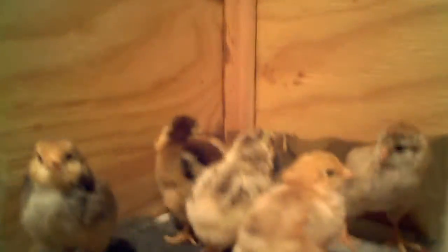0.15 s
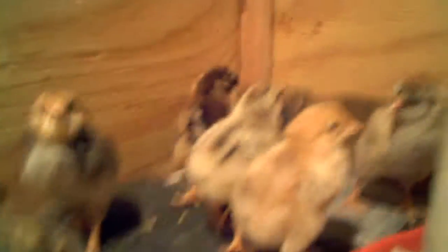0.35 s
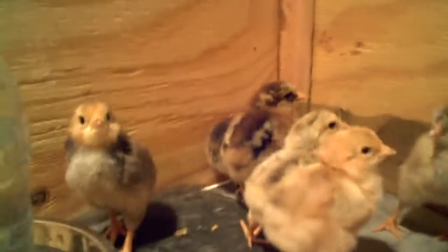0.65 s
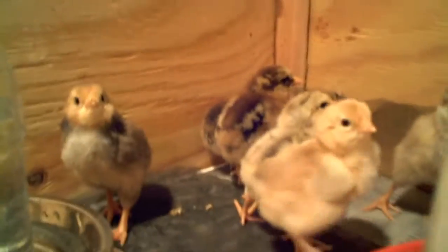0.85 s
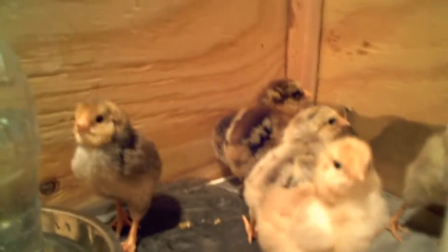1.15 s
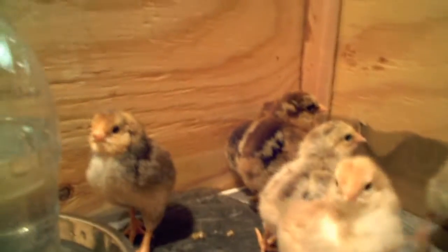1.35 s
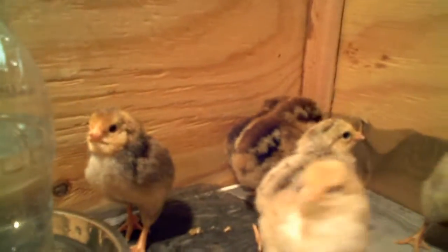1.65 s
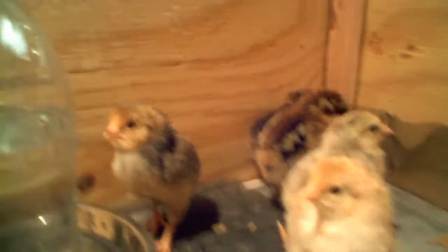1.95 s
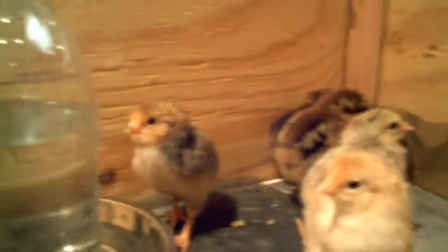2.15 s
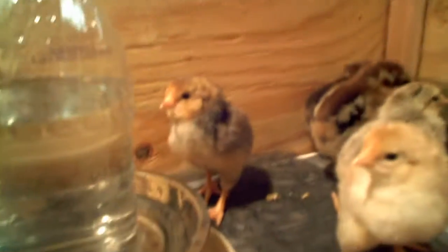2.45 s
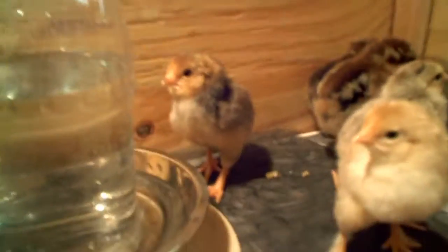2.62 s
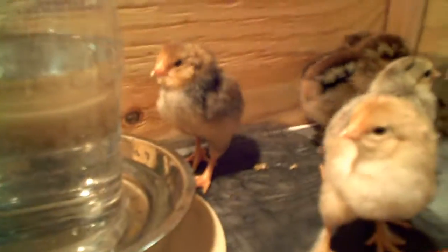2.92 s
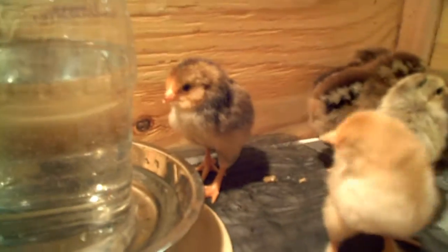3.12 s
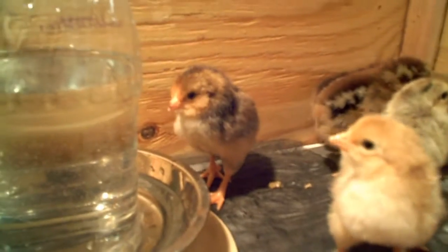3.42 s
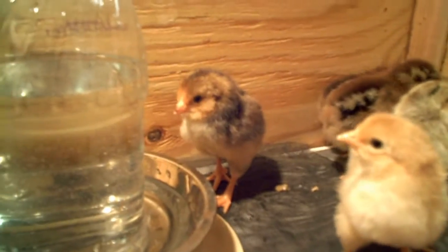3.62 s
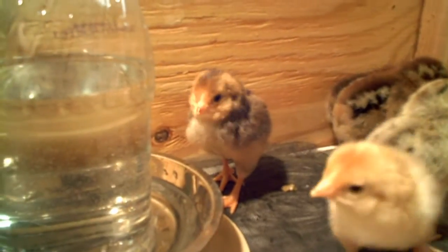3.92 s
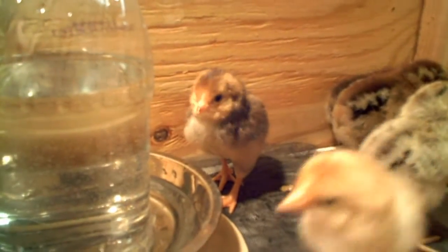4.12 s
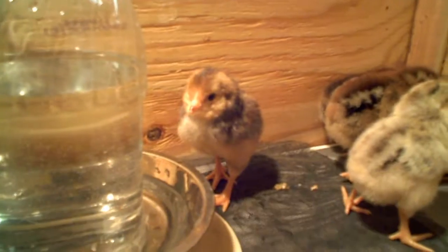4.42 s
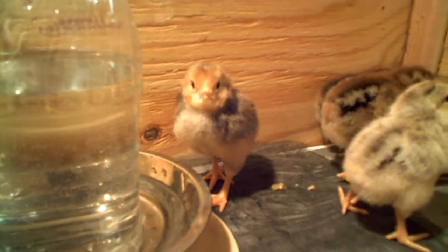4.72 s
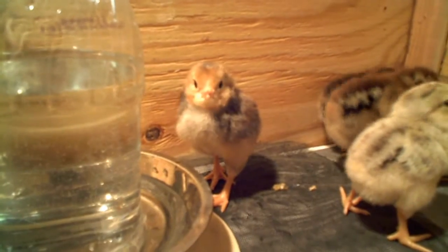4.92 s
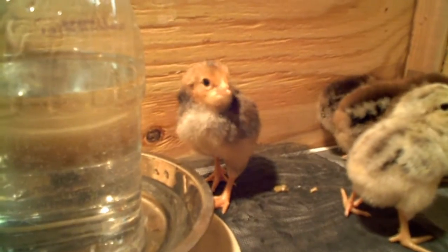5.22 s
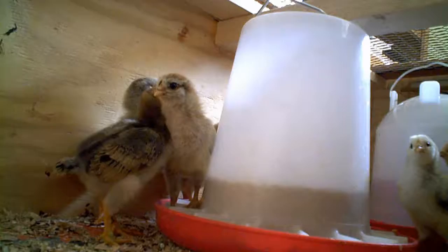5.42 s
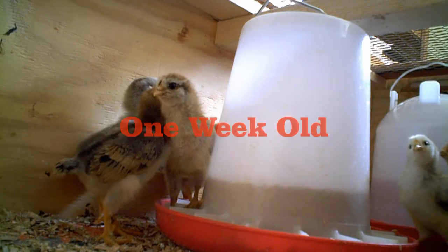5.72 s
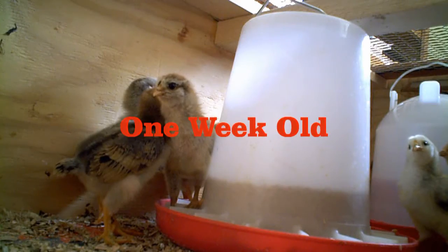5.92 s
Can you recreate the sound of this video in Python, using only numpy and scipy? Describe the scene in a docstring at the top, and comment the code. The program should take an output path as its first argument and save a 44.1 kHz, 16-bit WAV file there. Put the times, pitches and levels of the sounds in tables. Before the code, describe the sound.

Young chicks peep and chirp in short gliding whistles, with two loud handling clicks early on, light foot taps and soft brushing in a wooden box.

```python
"""Young chicks peep, chirp and twitter in a plywood brooder box, close to a hand-held camera.
Their calls are gliding whistles that flutter as echoes from the near walls mix in. Feet and beaks
ring, tap and scratch the hollow floor, which also hums with tiny slips as something drags over it.
Filtered friction noise brushes along in short strokes; the camera body gives two loud and two
fainter clicks through its shell resonances. Quiet coloured noise is the room air."""
import sys
import numpy as np
from scipy import signal
from scipy.fft import rfft, irfft, next_fast_len
from scipy.io import wavfile
from scipy.ndimage import uniform_filter1d, map_coordinates

SR = 44100
rng = np.random.default_rng(int(sys.argv[2]) if len(sys.argv) > 2 else 0)


def inscribe(sig):
    """Save sig as 16-bit PCM at rate SR to the path in sys.argv[1].

    A 1-D sig is mono; a 2-D sig holds one channel per row.
    Samples are clipped to [-1, 1] before scaling.
    """
    pcm = np.round(np.clip(np.atleast_2d(sig).T, -1, 1) * 32767)
    wavfile.write(sys.argv[1], SR, pcm.astype(np.int16))


N = 267246

# spectrum of contact noise on the boards: (f/Hz, level/dB)
TAP = [(100, -27.5), (600, -1), (1250, -0.5), (1700, -3), (2500, -15), (4000, -15.5), (8000, -32.5)]
# spectrum of fine scratching, also the crack of a click and the rasp of a call: (f/Hz, level/dB)
SCRATCH = [(1500, -13), (3000, -4), (4800, -2.5), (10000, -16), (16000, -25)]
PANEL_S = 0.4  # how long the floor may ring
SPOT_OCTAVES = 0.22  # how near a mode must be to the struck spot's pitch to be favoured
TOP_HZ = 16100  # band limit


def amp(db):
    """Decibels to gain."""
    return 10 ** (np.asarray(db) / 20)


def unit(x):
    """Scale to rms 1."""
    return x / np.sqrt(np.mean(x ** 2) + 1e-20)


def along(points, hz):
    """Interpolate (f/Hz, value) points on a log frequency axis."""
    f, v = np.transpose(points)
    return np.interp(np.log(hz + 1), np.log(f), v)


def bell(hz, centre_hz, octaves):
    """A hump of height 1 around one pitch."""
    return np.exp(-(np.log2(hz / centre_hz) / octaves) ** 2)


def tilt(hz, db_per_octave):
    """A spectral slope in dB that levels out below 500 Hz and above 6500 Hz."""
    return db_per_octave * np.log2(np.clip(hz, 500, 6500))


def wobble(rate, size):
    """A smooth random curve, rate knots a second."""
    knots = rng.standard_normal(int(size * rate / SR) + 4)
    return map_coordinates(knots, [np.arange(size) * rate / SR])


def noise(spectrum, size, tilt_db=0, grain_db=0):
    """Coloured noise of rms 1, tilted per octave; the grain makes it catch and slip."""
    m = next_fast_len(size + 2048)
    hz = np.fft.rfftfreq(m, 1 / SR)
    drive = rng.standard_normal(m) * amp(grain_db * wobble(1100, m))
    colour = amp(along(spectrum, hz) + tilt(hz, tilt_db))
    return unit(irfft(rfft(drive) * colour, m)[:size])


def envelope(length, attack, release):
    """A smooth attack, hold and release."""
    t = np.arange(round(length * SR)) / SR
    rise = np.sin(np.pi / 2 * np.clip(t / attack, 0, 1))
    fade = np.sin(np.pi / 2 * np.clip((length - t) / release, 0, 1))
    return rise * fade


def add(track, s, sound):
    """Mix a sound in at time s."""
    i = round(s * SR)
    part = sound[max(-i, 0):max(N - i, 0)]
    track[max(i, 0):max(i, 0) + len(part)] += part


def room_air():
    """Quiet steady noise in the spectrum of the room air."""
    # air spectrum: (f/Hz, level/dB)
    air_spectrum = [(50, -22), (150, -7.5), (260, 1.5), (1400, -0.5), (2500, -7), (7000, -15.5),
                    (16000, -28.5)]
    return amp(-63) * noise(air_spectrum, N)


def panel(t, spot_hz, spot_db):
    """The floor's decaying modes answer a touch; each spot favours those near one pitch."""
    # floor modes: (f/Hz, level/dB, t60/s)
    floor_modes = [(92.8, -43.5, 1), (151, -20.5, 0.23), (198.6, -14.5, 0.07), (284, -12, 0.075),
                   (395.2, -2.5, 0.083), (552.6, -2.5, 0.045), (678.5, -3, 0.044), (967, -6.5, 0.05),
                   (1114, -9, 0.049), (1192, -3, 0.048), (1613, -8, 0.043)]
    ring = 0
    for hz, db, t60 in floor_modes:
        mode_db = db + spot_db * bell(hz, spot_hz, SPOT_OCTAVES) + rng.normal(0, 0.82)
        ring = ring + amp(mode_db - 60 * t / t60) * np.sin(2 * np.pi * hz * t) * rng.choice([-1, 1])
    return ring


def shuffling():
    """Dragging keeps the floor humming with a dense stream of tiny slips, with rubbing beside them."""
    # bouts of dragging on the boards: (t/s, length/s, level/dB)
    drag_bouts = [(-.05, 1, -55.5), (0.626, 0.58, -45), (1.19, 0.97, -58), (2.546, 0.79, -56),
                  (4.543, 0.23, -47)]
    # soft slips mostly move the lower modes: (low f/Hz, high f/Hz)
    slip_band = [110, 870]
    slips_per_s, rub_db, lumps_db = 450, -12, 2.2  # lumps: unevenness of the drag
    attack_s, release_s = 0.094, 0.3  # a drag starts quickly and fades slowly
    drag = np.zeros(N)
    for s, length, db in drag_bouts:
        add(drag, s, amp(db) * envelope(length, attack_s, release_s))
    slips = rng.standard_normal(N) * (rng.random(N) < slips_per_s / SR)
    slips = signal.sosfilt(signal.butter(1, slip_band, "band", fs=SR, output="sos"), slips)
    floor = panel(np.arange(int(PANEL_S * SR)) / SR, spot_hz=160, spot_db=4)
    hum = unit(signal.fftconvolve(slips, floor)[:N])
    rub = amp(rub_db) * noise(TAP, N, grain_db=0.5)
    return drag * unit((hum + rub) * amp(lumps_db * wobble(55, N)))


def brushing():
    """Surging strokes of friction and snapping fibres, each with its own resonance."""
    # strokes: (t/s, length/s, level/dB, tilt/dB per octave, hiss/dB)
    stroke_table = [(0.186, 0.17, -44, -1, 4.5), (0.382, 0.8, -56.5, -0.5, 6),
                    (1.296, 0.018, -48.5, 3.5, 3), (1.319, 0.12, -57.5, 3, 1),
                    (1.402, 0.085, -42.5, 4.5, 4.5), (1.475, 0.088, -38, 4, 3), (1.545, 0.085, -37, 5.5, 1),
                    (1.622, .27, -44.5, 0.8, 4.5), (1.852, .24, -53, 3.5, -6), (1.969, 0.075, -34.5, 0, -3),
                    (2.128, 0.084, -39, 3, -5.5), (2.239, 0.29, -49.5, -1, 0), (2.443, 0.069, -44, -0.5, 6),
                    (2.511, 0.13, -43.5, 1.5, 1), (2.621, 0.16, -47, 1, -0.5), (2.775, 0.16, -53, 1, 8),
                    (3.2, 0.13, -51.5, -6, -5)]
    # brush spectrum: (f/Hz, level/dB)
    brush_spectrum = [(100, -26.5), (350, -13.5), (700, 0.5), (2000, 1.5), (3400, -.5), (4000, -8.5),
                      (4850, -14.5), (5700, -10), (6700, -18), (8200, -22), (11000, -36.5), (16000, -39.5)]
    # where the hiss sets in: (start f/Hz, full f/Hz)
    hiss_onset = [4960, 6100]
    # range of a stroke's resonance: (low f/Hz, high f/Hz)
    ring_range = (2076, 2970)
    peak_db, width_hz = 4, 170  # the resonance
    press, lift = 0.28, 0.6  # attack and release as shares of a stroke
    snaps_per_s, snap_db = 4000, -4.5
    out = np.zeros(N)
    for s, length, db, tilt_db, hiss_db in stroke_table:
        held = envelope(length, press * length, lift * length)
        size = len(held)
        pressure = amp(db + 1.3 * wobble(60, size) + 1.9 * wobble(500, size)) * held
        snaps = unit(rng.standard_normal(size) * (rng.random(size) < snaps_per_s / SR))
        friction = rng.standard_normal(size) + amp(snap_db) * snaps
        hz = np.fft.rfftfreq(size, 1 / SR)
        ring_hz = rng.uniform(*ring_range)
        ring_db = peak_db / (1 + ((hz - ring_hz) / width_hz) ** 2)
        hiss = hiss_db * np.interp(hz, hiss_onset, [0, 1])
        colour = amp(along(brush_spectrum, hz) + ring_db + hiss + tilt(hz, tilt_db))
        add(out, s, pressure * unit(irfft(rfft(friction) * colour, size)))
    return out


def clicks():
    """A hard impulse through the camera's heavily damped shell, with a brief gritty crack."""
    # clicks on the camera body: (t/s, level/dB, tilt/dB per octave)
    click_table = [(.189, 13, -1.5), (0.705, 4.5, -5), (2.093, -19.5, 4), (2.165, -10, 5.5)]
    # shell resonances: (f/Hz, bandwidth/Hz, level/dB)
    shell_modes = [(702, 187, 1.5), (1373, 210, 0.5), (1770, 130, -3.5), (2395, 200, -4), (3440, 210, -5.5),
                   (5260, 470, -16), (8050, 900, -27.5)]
    out, size = np.zeros(N), SR // 10
    hz, t = np.fft.rfftfreq(size, 1 / SR), np.arange(size) / SR
    shell = 0
    for k, (centre, width, db) in enumerate(shell_modes):
        resonance = 1j * hz * width / (centre * centre - hz * hz + 1j * hz * width)
        shell = shell + (-1) ** k * amp(db) * resonance
    shell = shell * (1j * hz / (1j * hz + 220)) ** 2  # the small shell radiates little bass
    for s, db, tilt_db in click_table:
        slope = amp(tilt_db * np.log2(np.clip(hz, 600, 6000) / 600))
        ring = np.fft.fftshift(irfft(shell * slope, size))  # the impulse sits mid-buffer
        add(out, s - size / SR / 2, amp(db) * ring / np.linalg.norm(ring))
        crack = noise(SCRATCH, size) * amp(-60 * t / 0.022)
        add(out, s, amp(db + 2 * tilt_db - 38) * crack)
    return out


def patter():
    """The lightest steps come at random: rows of (t/s, level/dB, hardness/dB, f/Hz)."""
    per_s, loudest_db, end_s = 13, -45, 3.9
    draws = rng.random((int(per_s * end_s), 3))
    return [(end_s * when, loudest_db - 8 * weak, 10 * (hard - 1), 400 + 700 * hard)
            for when, weak, hard in draws]


def floor_tap(colour, t, tilt_db):
    """Contact noise on the boards with a fast decay and a weaker, slower one."""
    decay = amp(-60 * t / 0.044) + amp(-10) * amp(-60 * t / 0.19)
    return noise(colour, len(t), tilt_db=tilt_db) * decay


def steps():
    """A foot or beak rings the floor, taps and scratches it; soft steps are duller; a toe tap follows."""
    # feet and beaks: (t/s, level/dB, hardness/dB: more scratch and less thud, struck spot f/Hz)
    step_table = [(.126, -32, 2, 1600), (0.323, -33.5, -3.5, 400), (.337, -33.5, -9, 543),
                  (.563, -37, 4, 1090), (.582, -33, -3.5, 660), (.674, -36.5, -7, 400),
                  (.784, -29, -8, 570), (.804, -30, -40, 400), (0.897, -37, -28, 680),
                  (1.04, -35.5, -4.5, 674), (1.345, -42, -4, 670), (1.482, -33, -2, 545),
                  (1.594, -34, 0, 630), (1.88, -42.5, 3, 950), (2.697, -34.5, 5, 545),
                  (2.935, -31, -1.5, 424), (3.041, -40, 0, 990), (3.13, -29, -6.5, 696),
                  (3.2, -31.5, -6.5, 418), (3.622, -35.5, -5, 1010), (3.67, -38.5, 2.5, 694),
                  (3.732, -40.5, 9.5, 400), (4.094, -39, 2.5, 970), (4.13, -31.5, -7.5, 570),
                  (4.166, -37, -7, 460), (4.234, -40.5, -3, 280), (4.38, -35, 0, 1230),
                  (4.467, -32.5, -3, 432), (4.564, -40.5, -3, 418), (4.635, -35, -6, 417),
                  (4.702, -18, 3.5, 1090), (4.756, -18, -3, 378), (4.911, -42, 7.5, 410)]
    thud_db, tap_db, scratch_db = -6.5, -6, -12  # at hardness 0, relative to the step's level
    spot_db, tap_octaves = 8, 0.41  # emphasis at the spot's pitch; its width in the tap
    tap_tilt = 0.27  # dB per octave for each dB of hardness
    contact_s, firm_db = 0.001, 6.5  # attack time at hardness 0; hardness that halves it
    toe_s, toe_db = 0.022, -20  # longest delay of the toes after the foot; their level
    out, t = np.zeros(N), np.arange(int(PANEL_S * SR)) / SR
    hz = np.geomspace(TAP[0][0], TOP_HZ)
    for s, db, hard_db, spot_hz in step_table + patter():
        thud = panel(t, spot_hz, spot_db) * (1 - np.exp(-t / 0.0011))
        colour = np.column_stack([hz, along(TAP, hz) + spot_db * bell(hz, spot_hz, tap_octaves)])
        tap = floor_tap(colour, t, tap_tilt * hard_db)
        toe = floor_tap(colour, t, tap_tilt * hard_db)
        scratch = noise(SCRATCH, len(t)) * amp(-60 * t / 0.023)
        blow = amp(thud_db - hard_db / 2) * thud + amp(tap_db) * tap
        blow = blow + amp(scratch_db + hard_db) * scratch
        onset = 1 - np.exp(-t / contact_s * 2 ** (hard_db / firm_db))
        add(out, s, amp(db) * blow * onset)
        add(out, s + toe_s * rng.uniform(0.35, 1), amp(db + toe_db) * toe * onset)
    return out


def swell(size, crest):
    """The effort of a call: a thin start, an arch with its top at crest (share of length), a thin end."""
    knots = [0, np.clip(crest, .05, .95), 1]
    arch = np.sin(np.interp(np.linspace(0, 1, size), knots, [0, np.pi / 2, np.pi]))
    return 0.33 + np.abs(arch) ** 2.1


def whistle(pitch, effort, overtone_db=0):
    """One gliding whistle with weak overtones and a slight tremble, coloured by the throat."""
    # throat resonances and dips: (f/Hz, level/dB)
    throat = [(2300, 7), (3000, -4.5), (3600, -1), (4300, -12.5), (4600, 9.5), (6200, 4), (7300, -3),
              (8500, -10.5)]
    second_db, third_db = -23.5, -29.5  # partials of a call that tops out at pure_hz
    pure_hz, pure_db_per_khz = 2970, 13  # higher calls have weaker overtones
    size = len(pitch)
    phase = 2 * np.pi * np.cumsum(pitch * (1 + 0.0022 * wobble(323, size))) / SR
    pure_db = pure_db_per_khz * (pitch.max() - pure_hz) / 1000 - overtone_db
    partials = [0, second_db - pure_db, third_db - pure_db]
    tone = sum(amp(db + along(throat, k * pitch)) * np.sin(k * phase)
               for k, db in enumerate(partials, 1))
    rasp = amp(-32.5) * noise(SCRATCH, size, tilt_db=23)
    tremble = amp(1.1 * wobble(170, size))
    return tremble * effort * envelope(size / SR, 0.0016, 0.0012) * (tone + rasp)


def chirps():
    """A chirp creeps upward, flicks to its top as it thins and begins to drop back."""
    # rising chirps: (t/s, length/s, start f/Hz, top f/Hz, level/dB, thinning at the top/dB)
    chirp_table = [(2.193, .05, 2810, 4350, -43, -1), (2.641, 0.045, 2710, 3940, -37, -9),
                   (3.127, 0.064, 3090, 4300, -39, -6), (3.935, 0.063, 2990, 4410, -43, -0.5),
                   (5.104, 0.072, 2930, 4480, -42, 0.5)]
    flick_at, flick_width = 0.73, 0.23  # shares of the chirp's length
    creep_share, flick_edge = 0.308, 2.25  # slow rise as a share of the whole; steepness of the flick
    out = np.zeros(N)
    for s, length, start_hz, top_hz, db, thin_db in chirp_table:
        progress = np.linspace(0, 1, int(length * SR))
        flick = np.exp(-np.abs((progress - flick_at) / flick_width) ** flick_edge)
        rise = flick + (1 - flick) * creep_share * progress
        call = whistle(start_hz + (top_hz - start_hz) * rise, swell(len(flick), crest=0.42))
        add(out, s, amp(db + thin_db * flick) * call)
    return out


def trill():
    """One chick swings its pitch up and down twice without a break."""
    # corners of the two-arched trill: (t/s, f/Hz, level/dB)
    trill_path = [(.27, 3230, -49), (.279, 3700, -34), (.29, 3785, -26.5), (.298, 3540, -33),
                  (0.304, 3160, -19.5), (0.314, 3640, -27.5), (0.325, 3768, -25.5), (.337, 3040, -25.5),
                  (0.345, 2610, -38)]
    out = np.zeros(N)
    s, hz, db = np.transpose(trill_path)
    t = np.arange(s[0], s[-1], 1 / SR)
    pitch = uniform_filter1d(np.interp(t, s, hz), size=150)  # rounds the corners
    add(out, s[0], whistle(pitch, amp(np.interp(t, s, db)), overtone_db=8.5))
    return out


def peeps():
    """A peep shoots up, turns over and slides down."""
    # falling peeps: (t/s, length/s, top f/Hz, end f/Hz, level/dB, time to the top/s)
    peep_table = [(-.014, 0.035, 3290, 2740, -37.5, 0.0043), (0.132, 0.055, 3580, 2700, -42, 0.0031),
                  (0.319, 0.06, 3590, 2900, -36.5, 0.0044), (0.408, .052, 3234, 2790, -35.5, 0.0216),
                  (0.538, 0.052, 4360, 2930, -35, 0.01), (0.558, 0.02, 2760, 2300, -43.5, 0.0025),
                  (0.761, 0.065, 4145, 2790, -28.5, 0.012), (0.918, 0.057, 4310, 2872, -24.5, 0.0055),
                  (1.168, 0.058, 4000, 2865, -28.5, 0.0074), (1.546, .059, 3940, 3056, -37, 0.013),
                  (2.694, 0.022, 2980, 2200, -33, 0.0054), (2.988, 0.049, 3532, 2620, -28.5, .014),
                  (3.543, 0.038, 3084, 2440, -38.5, 0.0134), (4.085, 0.036, 3310, 2765, -28.5, 0.013),
                  (4.129, 0.035, 3040, 2490, -36.5, 0.015), (4.316, .029, 3275, 2720, -40.5, 0.0057),
                  (4.772, 0.039, 3680, 2870, -35.5, 0.011), (4.936, 0.046, 3320, 2840, -42, 0.012),
                  (5.542, 0.022, 2550, 2290, -47.5, 0.0078)]
    rise_share, turn_s = 0.419, 0.0028  # rise as a share of the fall; roundness of the turn
    # peeps topping out above even_hz plunge and then ease off; lower ones hold and then drop
    even_hz, bend_hz = 3650, 498
    out = np.zeros(N)
    for s, length, top_hz, end_hz, db, top_s in peep_table:
        t = np.arange(int(length * SR)) / SR - top_s
        sag = np.hypot(t, turn_s) - turn_s
        bend = (top_hz - even_hz) / bend_hz + 1e-6
        fall = np.expm1(-bend * sag / sag[-1]) / np.expm1(-bend)
        below_top = np.where(t < 0, rise_share * (t / top_s) ** 2, fall)
        pitch = top_hz + (end_hz - top_hz) * below_top
        add(out, s, amp(db) * whistle(pitch, swell(len(t), crest=0.52)))
    return out


def walls(x):
    """First echoes from the plywood sides comb the calls, so a gliding pitch flutters."""
    # echoes: (delay/s, strength as a gain, negative when inverted)
    echoes = [(.00197, 0.19), (.0043, -0.27), (.0095, 0.19)]
    out = x.copy()
    for delay, strength in echoes:
        add(out, delay, strength * x)
    return out


def box(x):
    """The short diffuse ring of the brooder: noise that decays at its own rate in each band."""
    # decay of the box: (f/Hz, t60/s)
    box_decay = [(100, 0.14), (3300, 0.34), (12000, 0.63)]
    hz, t, z = signal.stft(rng.standard_normal(SR // 2), SR, nperseg=256)
    decay = amp(-60 * t / along(box_decay, hz)[:, None])
    tail = signal.istft(z * decay, SR, nperseg=256)[1]
    return signal.fftconvolve(x, tail / np.linalg.norm(tail))[:N]


def scene():
    """Chicks in their box, near handling sounds and quiet room air."""
    calls = walls(peeps() + trill() + chirps())
    feet = steps()
    inside = calls + feet + box(amp(-18) * calls + amp(-16) * feet)
    return (room_air() + shuffling() + brushing() + clicks() + inside)[None]


def record(dry):
    """The small microphone rounds off hard peaks and loses deep bass; nothing passes the band limit."""
    m = next_fast_len(N + SR // 2)
    rounded = dry / (1 + np.abs(dry / .75) ** 4) ** (1 / 4)
    thin = signal.sosfilt(signal.butter(4, 88, "high", fs=SR, output="sos"), rounded)
    in_band = np.fft.rfftfreq(m, 1 / SR) < TOP_HZ
    return irfft(rfft(thin, m) * in_band, m)[..., :N]


dry = scene()
out = record(dry)
inscribe(out)
```